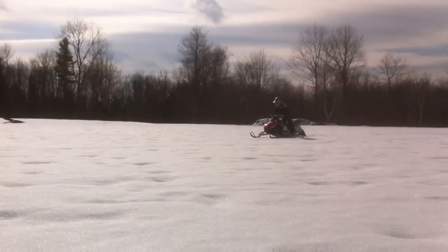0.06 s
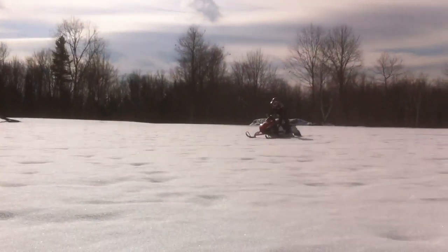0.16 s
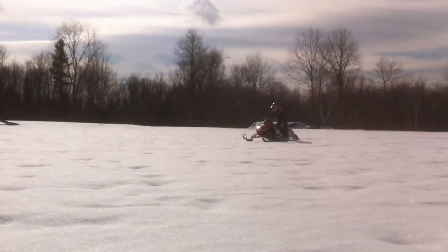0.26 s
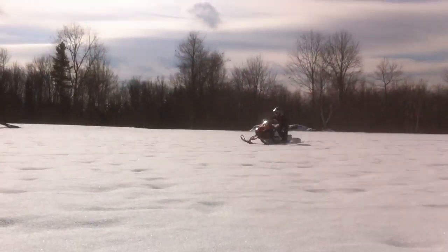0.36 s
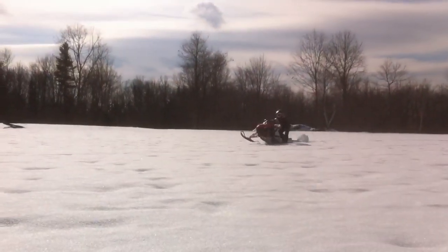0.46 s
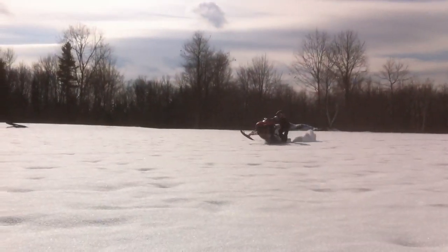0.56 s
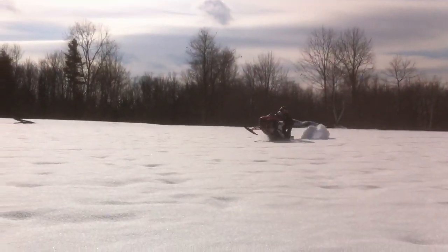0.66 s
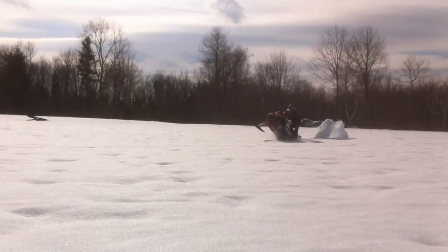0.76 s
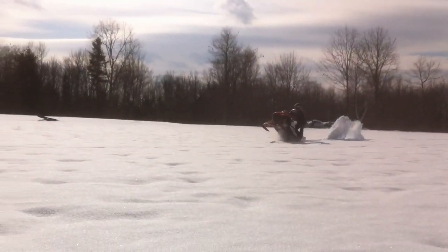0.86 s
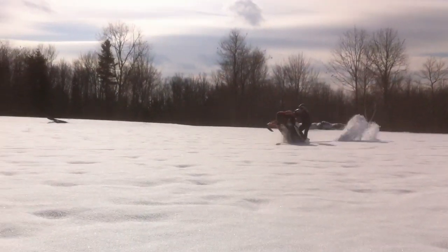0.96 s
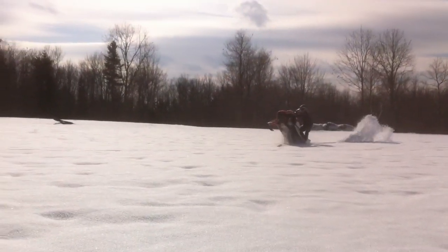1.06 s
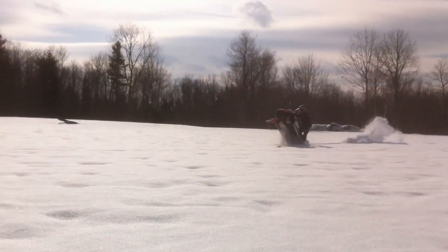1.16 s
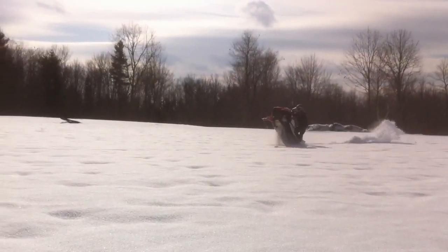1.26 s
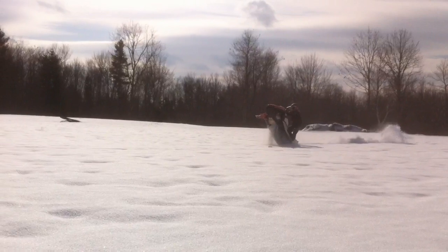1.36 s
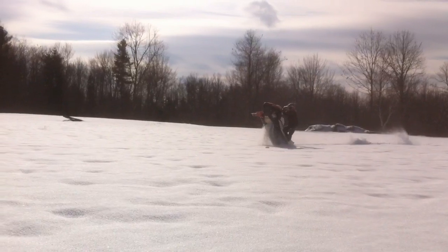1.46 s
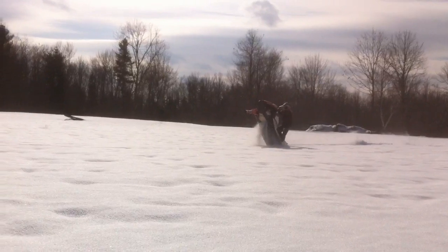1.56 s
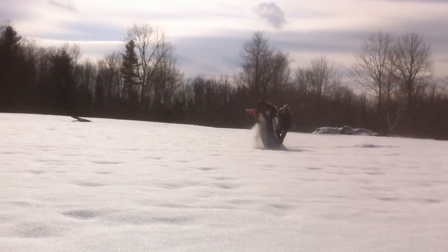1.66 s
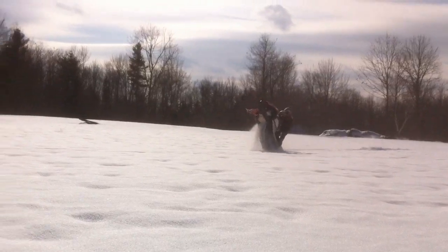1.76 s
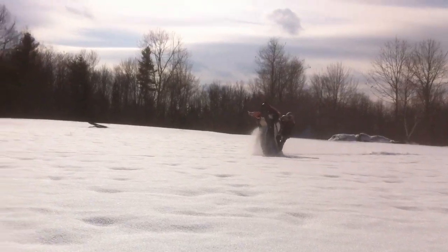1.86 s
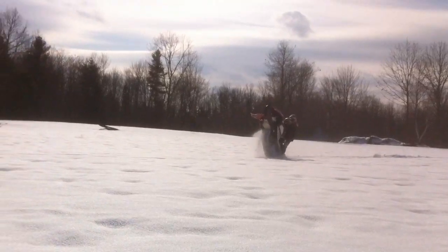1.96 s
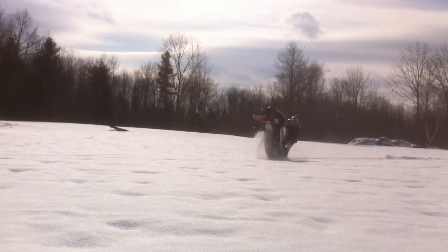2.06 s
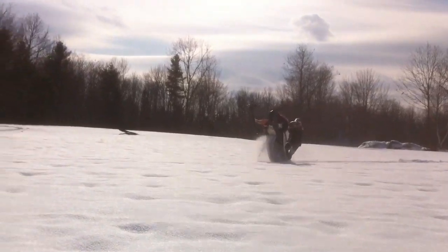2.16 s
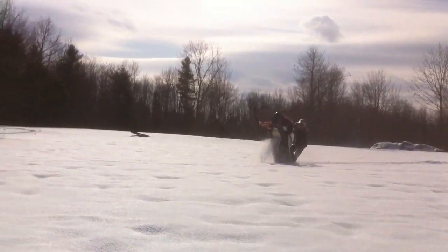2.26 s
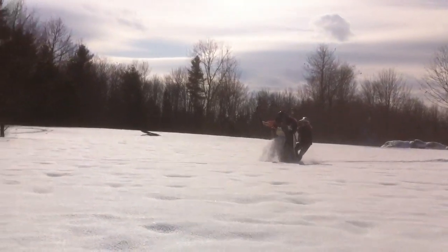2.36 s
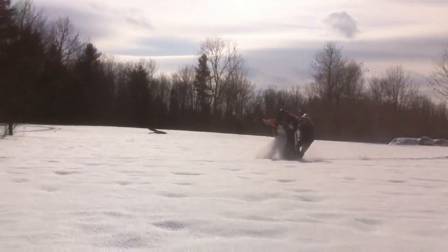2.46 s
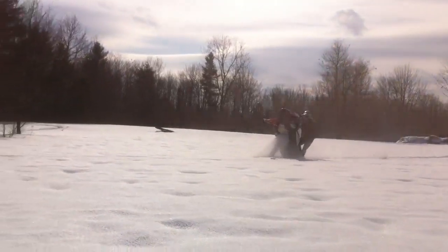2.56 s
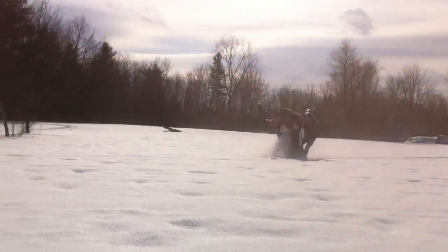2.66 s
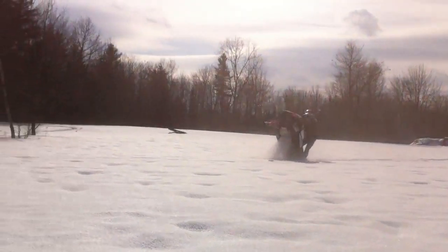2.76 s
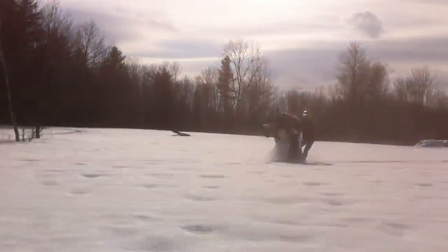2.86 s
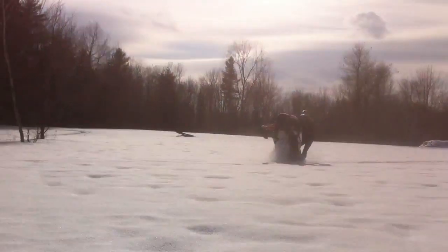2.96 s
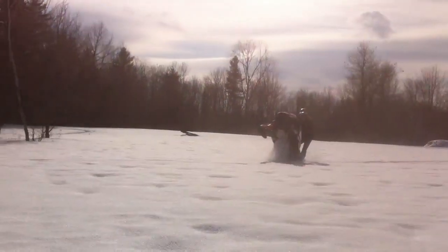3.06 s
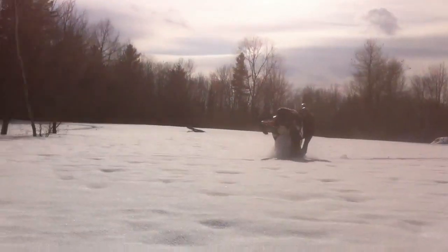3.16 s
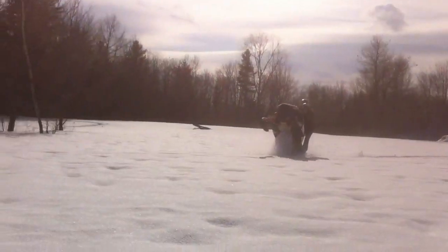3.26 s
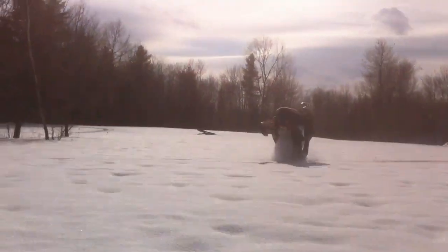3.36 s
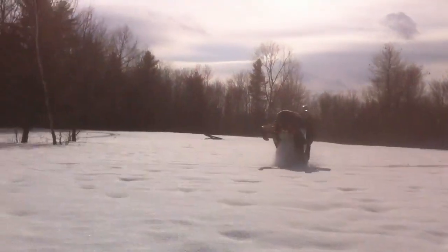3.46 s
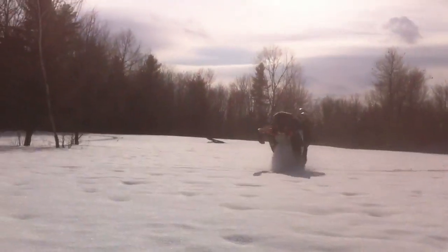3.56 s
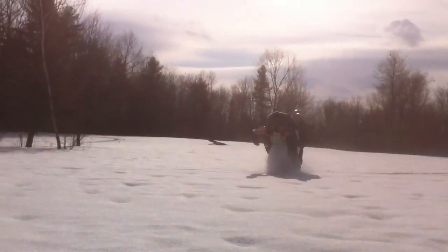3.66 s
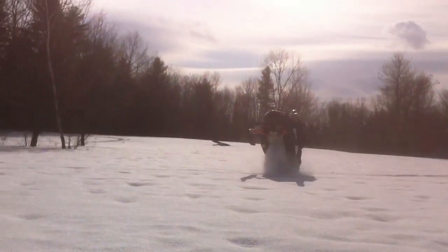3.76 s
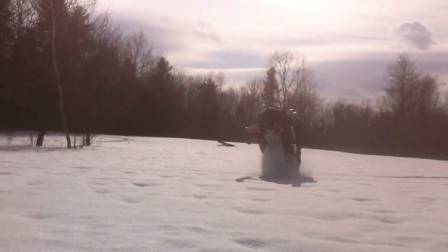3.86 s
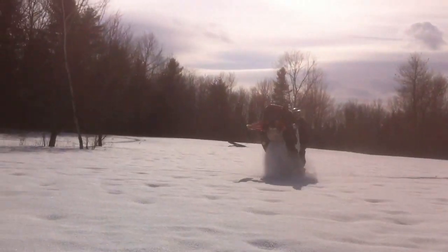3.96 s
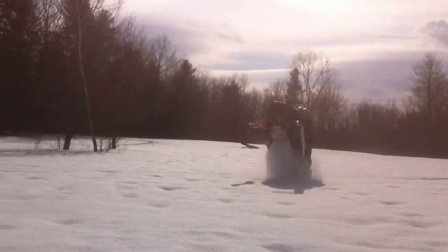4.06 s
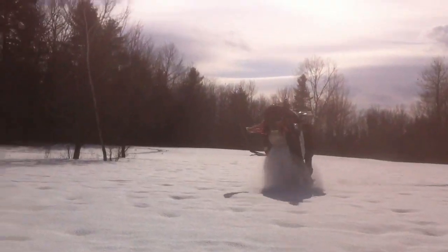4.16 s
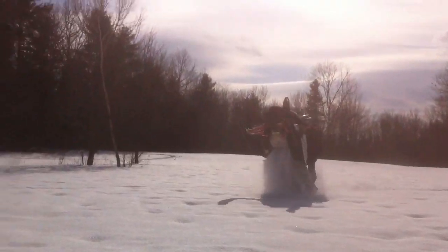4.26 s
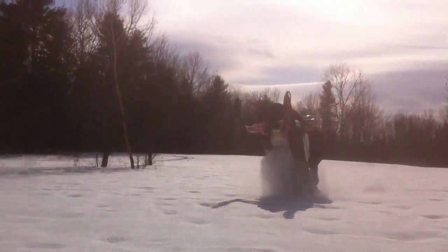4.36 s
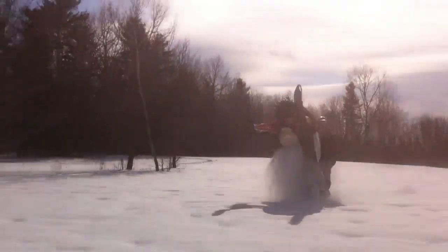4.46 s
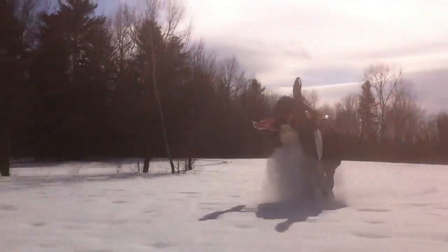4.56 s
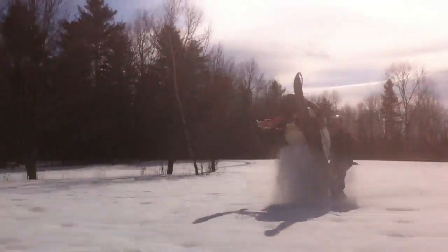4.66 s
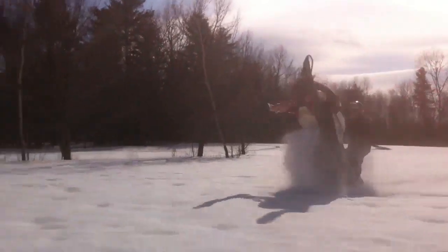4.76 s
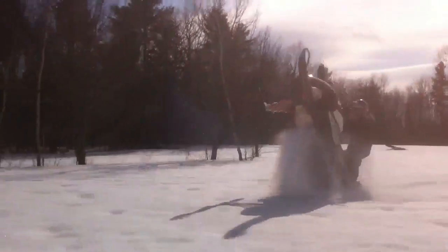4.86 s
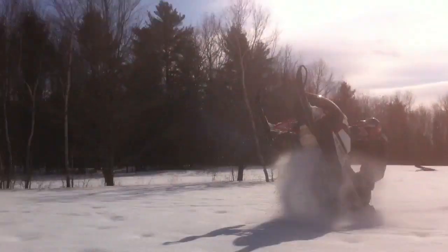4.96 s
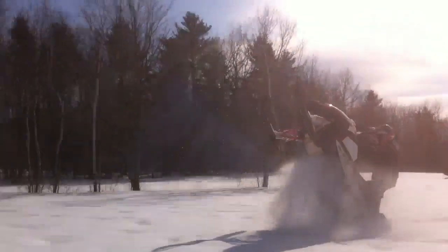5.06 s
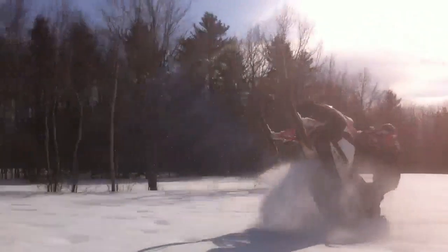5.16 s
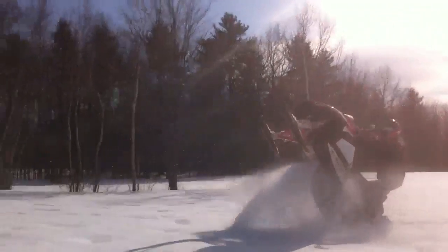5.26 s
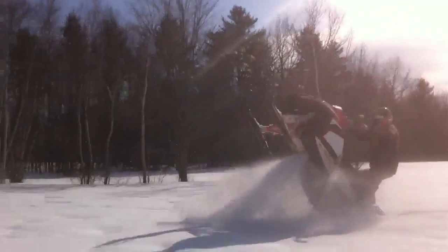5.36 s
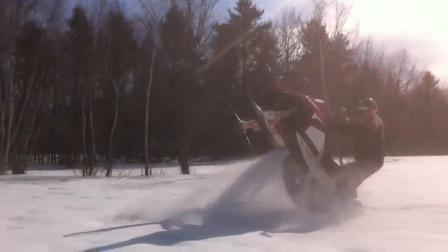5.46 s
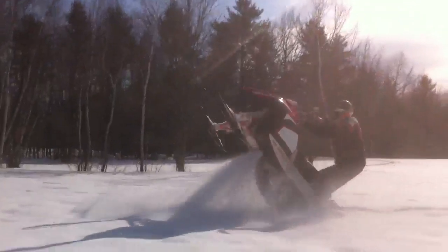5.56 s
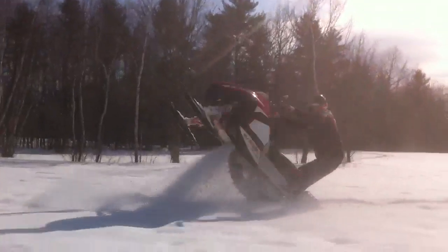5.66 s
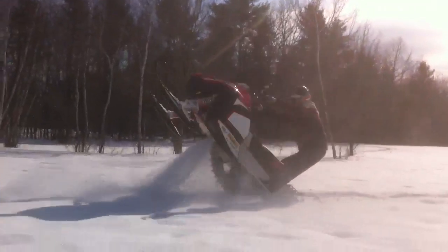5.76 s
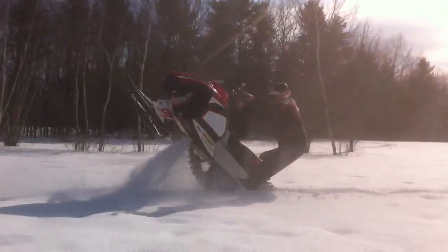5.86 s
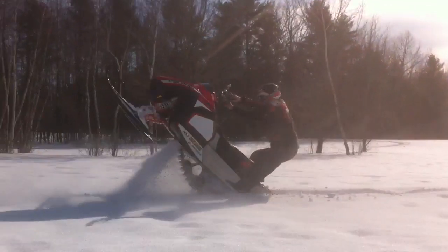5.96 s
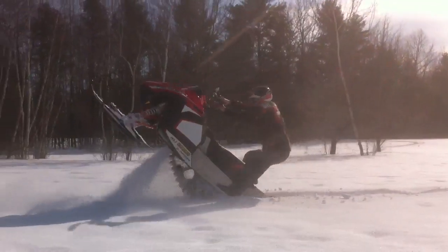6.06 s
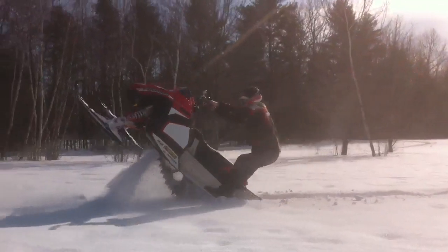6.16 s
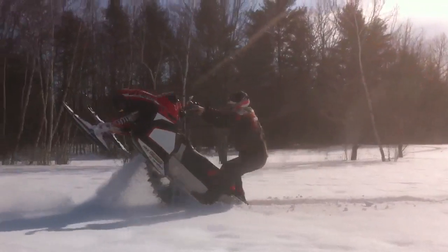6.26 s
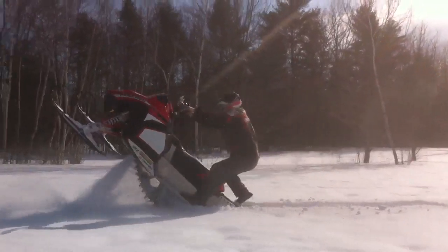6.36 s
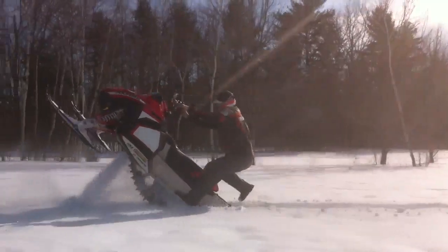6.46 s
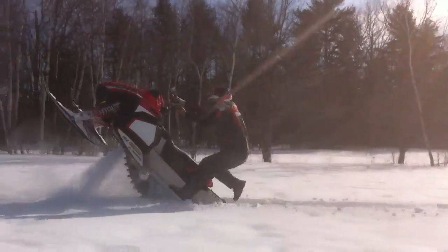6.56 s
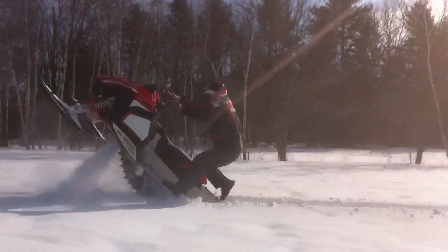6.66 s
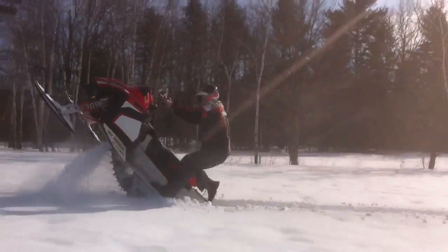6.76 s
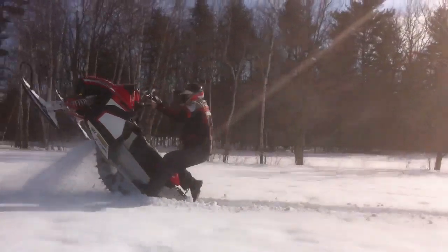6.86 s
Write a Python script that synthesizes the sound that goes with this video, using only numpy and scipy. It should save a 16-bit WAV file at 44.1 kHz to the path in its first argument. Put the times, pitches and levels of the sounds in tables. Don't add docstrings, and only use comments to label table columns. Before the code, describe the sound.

A single snowmobile engine starts faint and low, surges to a nasal buzzing whine, sags for a moment, then holds high revs. As it comes nearer, the rasp thickens, spray hisses and track lugs beat against the engine note. Around five seconds it sweeps by, its tone turning darker and rougher while the hiss brightens. Open field, no noticeable room echo, with a slightly hollow colour from snow, caught on a small mono microphone.

```python
import sys
import numpy as np
from scipy import signal
from scipy.fft import rfft, irfft, next_fast_len
from scipy.io import wavfile
from scipy.ndimage import uniform_filter1d, map_coordinates

SR = 44100
rng = np.random.default_rng(int(sys.argv[2]) if len(sys.argv) > 2 else 0)


def persist_wave(psi):
    counts = np.round(np.clip(psi, -1, 1) * 32767).astype(np.int16)
    wavfile.write(sys.argv[1], SR, np.atleast_2d(counts).T)


def gain_from_db(level_db):
    decades = np.asarray(level_db, float) / 20
    return 10 ** decades


N = 304731

# start_s, bearing [under 0 far and head-on, 0 front, 1 side, 4 leaving]
PATH = [
    (0, -3),
    (4.4, 0),
    (4.9, .6),
    (5.05, 1.3),
    (5.85, 1.7),
    (6.15, 3.3),
    (6.7, 3.6),
    (6.91, 4),
]
# freq_hz, gain_db
COWL = [(2100, 0), (2330, -3.5), (2550, 1.5), (2800, 1), (3100, 0), (3450, 0), (3650, 3.5), (3780, 2),
        (3910, -5.5), (4150, -2.5), (4400, 0)]


def unit(x):
    return x / np.sqrt(np.mean(x ** 2) + 1e-20)


def curves(rows):
    s, *cols = np.transpose(rows)
    return [np.interp(np.arange(N) / SR, s, c) for c in cols]


def along(points, hz):
    f, v = np.transpose(points)
    return np.interp(np.log(hz + 1), np.log(f + 1), v)


def wobble(rate_hz):
    knots = rng.standard_normal(int(N * rate_hz / SR) + 4)
    return map_coordinates(knots, [np.arange(N) * rate_hz / SR])


def rush(spectrum, patchy_db, behind=((1, 0), (2, 0))):
    hz, _, z = signal.stft(rng.standard_normal(N + 2048), SR, nperseg=2048)
    field = uniform_filter1d(rng.standard_normal(z.shape), size=20, axis=0)
    field = uniform_filter1d(field, size=3, axis=1)
    colour_db = along(spectrum, hz) + along(behind, hz)
    z = z * gain_from_db(patchy_db * unit(field) + colour_db[:, None])
    return unit(signal.istft(z, SR, nperseg=2048)[1][:N])


def lifts():
    # start_s, closed_s, recovery_s, speed_lost_hz, bark_lost_db
    eases = [
        (1.37, 0.088, 0.18, 8.2, 1),
        (1.65, 0.076, 0.16, 0.62, 0.5),
        (1.842, .14, .31, 35, 0.2),
        (1.848, 0.13, .34, 0.303, 6),
        (1.91, 0.04, 0.013, 0.33, -2.5),
        (4.529, .12, .19, 7.5, 0),
        (4.92, 0.11, 0.28, 8.9, 1.2),
        (4.969, 0.06, .15, .2, 1),
    ]
    fall_s, unburnt = 0.012, 1.75
    t, sag_hz, cut_db, weak_db = np.arange(N) / SR, 0, 0, 0
    for s, closed_s, back_s, lost_hz, lost_db in eases:
        shut_db = lost_db * np.clip((t - s) / min(fall_s, closed_s), 0, 1)
        since_s = t - s - closed_s
        rest = np.clip(1 - since_s / back_s, 0, 1)
        slowing = np.sin(np.pi / 2 * np.clip((t - s) / closed_s, 0, 1)) ** 2
        sag_hz = sag_hz + lost_hz * rest ** 1.3 * slowing
        cut_db = cut_db + shut_db * rest
        weak_db = weak_db + unburnt * shut_db * np.clip(1 - since_s / fall_s, 0, 1)
    return sag_hz, cut_db, weak_db


def throttle(cut_db):
    # start_s, bark_db, hiss_db
    roar = [(0, -44.5, -53.5), (.21, -40, -53), (.33, -35.5, -41), (.44, -28, -39), (.52, -29, -37),
            (.83, -30.5, -34), (1.06, -27.5, -32.5), (1.37, -25, -34.5), (1.83, -22, -33.5),
            (2.45, -21.5, -31.5), (3.14, -20.5, -30.5), (3.7, -18.5, -29.5), (4.18, -17, -27),
            (4.75, -20.5, -30.5), (5.3, -23, -32.5), (5.45, -22, -31), (5.65, -21, -28.5),
            (5.85, -20.5, -27), (6.06, -20.5, -27), (6.31, -22, -27), (6.6, -20, -26), (6.91, -19.5, -24.5)]
    bark_db, hiss_db = curves(roar)
    return bark_db - cut_db, hiss_db - 1.66 * cut_db


def crankshaft(sag_hz, near):
    # start_s, crank_turns_hz
    speed = [(0, 74.8), (.14, 77.2), (.2, 80.8), (.36, 101.9), (.44, 118.1), (.56, 136.9), (.62, 137.1),
             (1.06, 140.2), (3.2, 142), (3.7, 143.4), (4.08, 141.9), (4.3, 144.5), (4.9, 140.7),
             (5.4, 141.1), (6.06, 139.3), (6.39, 140.5), (6.5, 140.3), (6.91, 139.7)]
    turns_hz = curves(speed)[0] - sag_hz
    jitter_rad = 0.029 * (1 + 0.36 * near)
    crank = 2 * np.pi * np.cumsum(turns_hz) / SR + jitter_rad * wobble(45)
    return turns_hz, crank


def order_levels():
    viewed = [-2.9, -2.25, -1.2, -.55, -.05, .5, 1.49, 1.66, 2.9, 3.43, 3.75]
    # order, level_db
    idling = [(1, -27), (2, 0), (3, -9), (4, -24), (5, -12), (6, -14), (7, -21), (8, -21), (9, -24),
              (10, -9), (11, -29), (12, -16), (13, -24), (14, -25), (15, -4), (16, -6), (17, -10),
              (18, -24), (19, -14), (20, -17), (21, -11), (22, -20), (23, -12), (24, 0)]
    far = [(1, -22.5), (2, -6), (3, -30), (4, -2), (5, -11), (6, -8), (7, -24), (8, -1), (9, -3.5),
           (10, 2.5), (11, -17), (12, 3.5), (13, -6), (14, -3), (15, 0), (16, 0.5), (17, -3), (18, -1),
           (19, -15), (20, 1), (21, -18), (22, -7), (23, -9), (24, -9.5)]
    coming = [(1, -19.5), (2, -8), (3, -14), (4, -3), (5, -13.5), (6, -1), (7, -18), (8, -13), (9, -10.5),
              (10, 2.5), (11, -12), (12, 2), (13, -1.5), (14, -7.5), (15, -5.5), (16, -4), (17, -14),
              (18, -10), (19, -9), (20, -4), (21, -29), (22, -21), (23, -22), (24, -20)]
    front = [(1, -18), (2, -4), (3, -26), (4, -2), (5, -9), (6, -3), (7, -28), (8, -12), (9, -6), (10, 2),
             (11, -7), (12, 6), (13, -10), (14, 1.5), (15, -23), (16, -21), (17, -27), (18, -9), (19, -15),
             (20, -7), (21, -4), (22, -14), (23, -16), (24, -12)]
    rearing = [(1, -19), (2, 0), (3, -18), (4, -3), (5, -17), (6, -5), (7, -22), (8, -12), (9, -13),
               (10, 2.5), (11, -8), (12, -2), (13, -4), (14, -1), (15, -17), (16, -6), (17, -26), (18, -10),
               (19, -16), (20, -18), (21, -23), (22, -32), (23, -34), (24, -25)]
    turning = [(1, -15), (2, -1), (3, -22), (4, 0), (5, -17), (6, -6), (7, -26), (8, -15), (9, -24),
               (10, 1.5), (11, -8), (12, 0), (13, -10), (14, -4.5), (15, -13), (16, -7), (17, -20),
               (18, -19), (19, -14), (20, -26), (21, -19), (22, -24), (23, -35), (24, -25)]
    side_on = [(1, -17.5), (2, -6), (3, -12), (4, 0), (5, -22), (6, -10), (7, -14), (8, -20), (9, -15.5),
               (10, -4), (11, -19), (12, -8.5), (13, -35), (14, -10), (15, -14), (16, -18), (17, -23),
               (18, -24), (19, -13), (20, -15.5), (21, -19), (22, -27), (23, -39), (24, -28)]
    abeam = [(1, -14.5), (2, -7), (3, -9.5), (4, 0), (5, -15), (6, -8), (7, -15), (8, -2.5), (9, -10),
             (10, -7), (11, -10), (12, -5), (13, -26), (14, -16), (15, -5), (16, -18), (17, -18), (18, -11),
             (19, -8.5), (20, -17), (21, -17), (22, -31), (23, -40), (24, -39)]
    passing = [(1, -10), (2, -3), (3, -5), (4, 0), (5, -8), (6, -9), (7, -16), (8, -12), (9, -14),
               (10, -11), (11, -25), (12, -6), (13, -5), (14, -5), (15, -1), (16, -3), (17, -13), (18, -9),
               (19, -12), (20, -23), (21, -28), (22, -29), (23, -30), (24, -12)]
    behind = [(1, -9), (2, 0), (3, -4), (4, -8), (5, -5), (6, -4), (7, -6.5), (8, 0.5), (9, -10), (10, -14),
              (11, -25), (12, -11), (13, -8.5), (14, -9), (15, -11), (16, -8), (17, -22), (18, -7),
              (19, -21), (20, -31), (21, -20), (22, -22), (23, -14), (24, -16)]
    leaving = [(1, -8), (2, 0), (3, -2.5), (4, -4), (5, -21), (6, -5), (7, -15), (8, 4.5), (9, -20),
               (10, -14), (11, -16), (12, -8), (13, 6), (14, -9), (15, -3), (16, -12), (17, -22), (18, -16),
               (19, -23), (20, -25), (21, -29), (22, -25), (23, -15), (24, -18)]
    whine_db = [-28, -18.5, -28, -29, -34, -29, -32, -21, -23, -12, -17]
    views = [idling, far, coming, front, rearing, turning, side_on, abeam, passing, behind, leaving]
    table = np.array(views)[:, :, 1]
    table = table - 10 * np.log10(np.sum(gain_from_db(2 * table[:, 6:]), axis=1, keepdims=True))
    faint_db = np.where(np.array(viewed) < .6, -60, -27)
    table = np.hstack([table, np.outer(faint_db, np.ones(12))])
    table[:, 25] = whine_db
    return viewed, table


def firing_orders(crank, turns_hz, bark_db, cut_db, weak_db, bearing, near):
    # freq_hz, gain_db
    pipe = [(150, 0), (230, 13), (330, 0), (680, -1), (790, 11), (870, 14.5), (925, 6), (1000, 5),
            (1100, -1), (1400, 0), (1600, -4), (1700, 0), (2050, 0), (2150, 5), (2430, 6), (2530, 0)]
    seen = [-3, -2.82, -2.66, -2.49, -2.25, -1.76, -1.6, -1.5, -1.43, -.82, -.45, -.2, 0, .6, 1.2, 1.35,
            1.5, 1.68, 2.6, 3.3, 3.4, 3.57, 4]
    # clean_share_db, order_2_db, order_4_db, order_6_db, order_8_db
    firing_mix = [(-19, -1, -39, -6, -44), (-14, -8, -24, 1, -14), (-15, -8, -13, -10.5, -31),
                  (-3.5, -9, -24.5, -9, -14), (-1.5, -16, -8.5, -19.5, -12), (-1.5, -12, -7, -6, -26),
                  (-1.5, -15, -5.5, -11, -17.5), (-1, -18.5, -10, -13, -14), (-1, -15.5, -11, -4.5, -26),
                  (-1.5, -11.5, -6.5, -11.5, -20), (-4, -14, -10, -8.5, -19), (-1.5, -13, -8.5, -13, -15),
                  (-2, -8, -8, -8, -17), (0.7, -5, -1, -7, -14), (0, -7, 4, -1, -8),
                  (-6.5, -2.2, 1, -7, -18), (0, -3, 2.5, -7, -15), (-2, -9.5, -3.5, -11, -10.5),
                  (-2.5, -10, -3, -27, -32), (-2, -7, -7.5, -9.5, -18), (-4, -5, -19, -9, -9),
                  (-3, -6, -17, -14, -4.5), (0, -6.5, -6, -15, -8)]
    smear_rad, drift_rad = .015, .5
    stumble, spared = .3, .55
    viewed, table = order_levels()
    clean_db, *firing_db = [np.interp(bearing, seen, column) for column in np.transpose(firing_mix)]
    own_db = dict(zip((2, 4, 6, 8), firing_db))
    misfire = wobble(35)
    far_off = np.clip(-bearing - .8, 0, 1)
    tone, cruise_hz = np.zeros(N), np.median(turns_hz)
    for k in range(1, table.shape[1] + 1):
        pipe_db = along(pipe, k * turns_hz) - along(pipe, k * cruise_hz)
        if k in own_db:
            seen_db = own_db[k] + (k > 2) * pipe_db
        else:
            seen_db = clean_db + np.interp(bearing, viewed, table[:, k - 1]) + pipe_db
        unburnt_db = (1 - spared * (k in (2, 4, 6)) + stumble * np.abs(misfire)) * weak_db
        labour_db = 0.68 * ((k == 2) * (1 - near) + (k > 9)) * cut_db
        flutter_db = 1.29 * (1 + 0.32 * near * (k != 2) + .5 * (k > 8) + 1.1 * (k == 2) * far_off)
        level_db = bark_db + seen_db - unburnt_db - labour_db + flutter_db * wobble(9)
        shift = (k != 2) * (1 + 2 * (k % 2)) * drift_rad * wobble(2)
        tone -= np.sqrt(2) * gain_from_db(level_db) * np.cos(k * crank - smear_rad * (k * k - 4) + shift)
    return tone


def exhaust_gas(crank, bark_db, eased, near):
    # freq_hz, density_db_per_hz
    bark_far = [(100, -59), (170, -38.5), (279, -18), (335, -23.5), (498, -20), (566, -17.5), (634, -21.5),
                (841, -14), (928, -18), (1400, -11), (2000, -11), (2800, -9), (3500, -17), (5000, -21.5),
                (6500, -45), (11000, -120)]
    # freq_hz, density_db_per_hz
    bark_low = [(180, -44), (300, -20), (391, -19), (467, -7), (679, -15), (775, -6.5), (1080, -14),
                (2140, -2), (4200, -13.5), (5460, -51), (9240, -120)]
    # freq_hz, density_db_per_hz
    bark_close = [(100, -33), (170, -14.5), (224, -15.5), (277, -9), (334, -18.5), (418, -11.5), (621, -13),
                  (830, -9), (1040, -12), (1350, -8.5), (1500, -10.5), (1680, -14), (2030, -7.5),
                  (2320, -13), (2600, -10.5), (2950, -15.5), (3400, -18), (3750, -19), (4000, -16.5),
                  (5200, -99), (8800, -120)]
    firing = 1 + 0.028 * np.cos(2 * crank) + 0.0085 * np.cos(crank)
    open_gas = rush(bark_far, patchy_db=1.34, behind=COWL)
    low_gas = rush([(150, -60), *bark_low, (5500, -70)], patchy_db=1.2)
    afar = np.sqrt(1 - eased) * open_gas + gain_from_db(0.5) * np.sqrt(eased) * low_gas
    blast = np.sqrt(1 - near) * afar + gain_from_db(0.5) * np.sqrt(near) * rush(bark_close, patchy_db=1.0)
    return gain_from_db(bark_db - 3.5 + 0.36 * wobble(5.2)) * firing * blast


def intake_and_spray(crank, hiss_db, eased, near):
    # freq_hz, density_db_per_hz
    hiss_far = [(2500, -120), (3500, -1), (5000, 1), (7500, -2), (10000, -3.5), (12300, -3.5), (16000, -14)]
    # freq_hz, density_db_per_hz
    hiss_low = [(2500, -60), (3500, -6), (5000, 4.5), (7500, -1.5), (10000, -6), (12300, -7), (16000, -21)]
    # freq_hz, density_db_per_hz
    hiss_close = [(1650, -30), (2800, -20), (3100, -72), (3760, -70), (4130, 6), (7200, 4), (11100, 4),
                  (15700, -5)]
    afar = np.sqrt(1 - eased) * rush(hiss_far, patchy_db=1.05, behind=COWL)
    afar = afar + np.sqrt(eased) * rush(hiss_low, patchy_db=1.1, behind=COWL)
    spray = np.sqrt(1 - near) * afar + np.sqrt(near) * rush(hiss_close, patchy_db=1)
    level_db = uniform_filter1d(hiss_db, size=SR // 16) + 0.77 * wobble(9)
    return gain_from_db(level_db) * (1 + 0.087 * np.cos(2 * crank)) * spray


def chassis(bark_db, cut_db, near):
    # freq_hz, density_db_per_hz
    rumble = [(20, -60), (45, -46), (70, -21), (100, -23.5), (140, -6), (200, -9.5), (300, -8.5),
              (500, -120)]
    level_db = bark_db + 0.92 * cut_db - 26.0 + 2.9 * near + 3.7 * wobble(11)
    return gain_from_db(level_db) * rush(rumble, patchy_db=1.5)


def snow(x):
    # start_s, delay_ms, strength [0-1]
    echo = [(0, .163, .66), (1, .159, .68), (4.8, .1585, .66), (4.94, .1585, .55), (5.0, .218, .48),
            (5.06, .265, .3), (5.13, .29, .06), (6.91, .3, .05)]
    turn_rad, dull_hz = 1.545, 13000
    delay_ms, mirror = curves(echo)
    m = next_fast_len(N)
    dulling = 1 + (np.fft.rfftfreq(m, 1 / SR) / dull_hz) ** 14
    soft = irfft(rfft(x, m) * np.exp(1j * turn_rad) / dulling, m)
    delay = delay_ms * (1 + 0.01 * wobble(5.5)) * SR / 1000
    late = map_coordinates(soft, [np.arange(N) - delay], order=5, mode="nearest")
    return (x + mirror * late) / np.sqrt(1 + mirror ** 2)


def track(crank, bearing):
    # start_s, over_firing_rate_hz
    lug_rate = [(0, -60), (.62, -95), (1.85, -37), (2.05, -25), (2.3, -35), (3.2, -4), (3.55, 3),
                (3.72, 8.5), (3.87, 10), (3.97, 12.6), (4.16, 7.4), (4.33, 24.5), (4.43, 30.5), (4.58, 28),
                (4.72, 19.4), (4.99, 19.6), (5.12, 2.6), (5.34, 2.6), (5.63, -2.6), (5.7, -8), (5.97, -9.6),
                (6.08, -18), (6.38, -18.5), (6.5, -10.5), (6.91, -10)]
    # start_s, level_db
    lug_level = [(0, -66), (.62, -47.5), (1.85, -72), (2.05, -42), (2.3, -54), (3.2, -48), (3.52, -48),
                 (3.66, -33), (3.9, -31), (4.15, -31), (4.4, -25), (4.7, -26), (5.03, -26), (5.13, -38),
                 (5.34, -33), (5.5, -37), (5.64, -32), (5.9, -34), (6.15, -33), (6.45, -33), (6.91, -33)]
    # bearing, level_db
    lug_edge = [(-.4, -14), (.1, -7.5), (1.2, -18), (1.6, 1), (3.3, 0), (4, -10)]
    opposed_s = 4.206
    slip, = np.cumsum(curves(lug_rate), axis=1) / SR
    level_db, = curves(lug_level)
    overtone_db = np.interp(bearing, *np.transpose(lug_edge))
    turn = 2 * crank + 2 * np.pi * (slip - slip[round(opposed_s * SR)]) + .1 * wobble(12)
    overtones = np.sin(2 * turn) + gain_from_db(-0.5) * np.sin(3 * turn)
    shape = np.cos(turn) + gain_from_db(overtone_db) * overtones + gain_from_db(-16.0) * np.sin(1.5 * turn)
    return np.sqrt(2) * gain_from_db(level_db + 0.11 * wobble(1.75)) * shape


def thuds():
    # start_s, peak_db
    slams = [(0.207, -39), (0.397, -41), (0.484, -35.5), (0.641, -41), (0.818, -40), (1.024, -38),
             (1.131, -38), (1.789, -44), (2.118, -27), (2.499, -37), (2.87, -35), (4.449, -34), (4.66, -41),
             (4.819, -42), (6.849, -31)]
    push_s, pitch_hz = .0055, 129
    out, t = np.zeros(N + SR), np.arange(SR // 10) / SR
    push = np.sin(2 * np.pi * pitch_hz * t) * (t / push_s) * np.exp(1 - t / push_s)
    for s, db in slams:
        out[round(s * SR):][:len(t)] += gain_from_db(db - 2.5) * push
    return out[:N]


def scene():
    bearing, = curves(PATH)
    near = np.clip(bearing, 0, 1)
    sag_hz, cut_db, weak_db = lifts()
    bark_db, hiss_db = throttle(cut_db)
    eased = np.clip(np.maximum((-2.62 - bearing) / .1, cut_db / 7), 0, 1)
    turns_hz, crank = crankshaft(sag_hz, near)
    tone = firing_orders(crank, turns_hz, bark_db, cut_db, weak_db, bearing, near)
    noise = exhaust_gas(crank, bark_db, eased, near) + intake_and_spray(crank, hiss_db, eased, near)
    rumble = chassis(bark_db, cut_db, near)
    mono = tone + rumble + snow(noise) + track(crank, bearing) + thuds()
    return np.array([mono, mono])


def top_cut(x):
    return signal.sosfilt(signal.butter(12, 16850, fs=SR, output="sos"), x)


def record(dry):
    # freq_hz, under_neighbours_db
    masking = [(150, -60), (3000, -30), (3900, -5.5), (4400, -6), (4800, -6), (5300, -4.5), (8000, -5.5),
               (9800, -2.8), (10500, -3.5), (10800, -2.6), (11120, -2.6), (11300, -3.6), (12400, -3.2),
               (13300, -2.6), (14400, -1.8), (15700, -4)]
    # start_s, low_hz, high_hz
    filled = [(.46, 7600, 9000), (.65, 7600, 9000), (1.56, 5200, 6300), (2.58, 6300, 7600),
              (3.25, 7600, 9000), (4.41, 6900, 9000), (4.74, 7600, 9000), (5.11, 7600, 9000),
              (5.11, 4200, 5700), (5.39, 4200, 5200), (5.39, 10400, 11800), (5.76, 8300, 10400),
              (5.76, 11800, 13200), (5.97, 4700, 5700), (6.46, 5200, 7600), (6.89, 11100, 13200)]
    top_hz, bass_hz = 15800, 75
    hz, t, z = signal.stft(dry, SR, window="cosine", nperseg=2048)
    power = uniform_filter1d(np.abs(z[0]) ** 2, size=4, axis=0)
    power = uniform_filter1d(power, size=2, axis=1)
    narrow = power[np.arange(len(hz)) // 4 * 4] + 1e-20
    around = np.exp(uniform_filter1d(np.log(narrow), size=110, axis=0))
    mask = around * gain_from_db(2 * along(masking, hz) + 2.8)[:, None]
    response = (hz < top_hz - 40) / np.sqrt(1 + (bass_hz / (hz + 1)) ** 4)
    z = z * (narrow > mask) * response[:, None]
    for s, lo_hz, hi_hz in filled:
        band = (hz > lo_hz) & (hz < hi_hz)
        spin = np.exp(2j * np.pi * rng.random((2, band.sum())))
        z[:, band, np.argmin(np.abs(t - s))] *= 1.3 * spin
    mix = signal.istft(z, SR, window="cosine", nperseg=2048)[1][:, :N]
    return top_cut(mix)


dry = scene()
out = record(dry)
persist_wave(out)
```